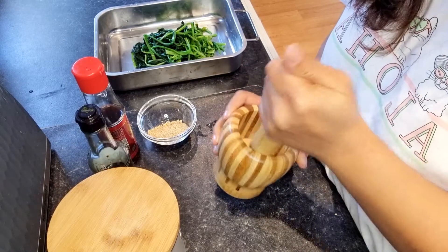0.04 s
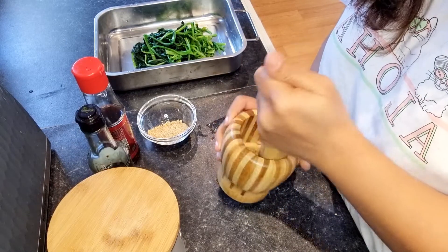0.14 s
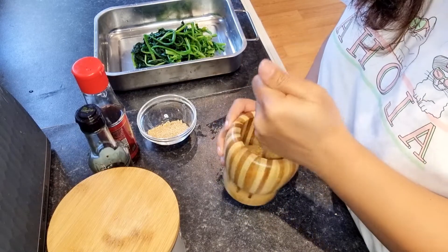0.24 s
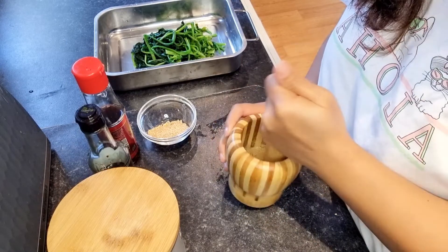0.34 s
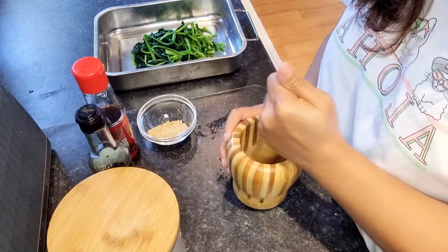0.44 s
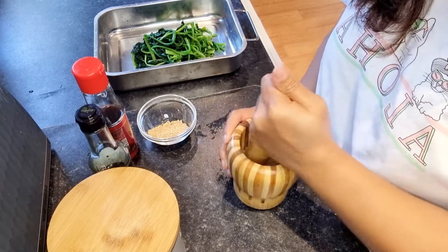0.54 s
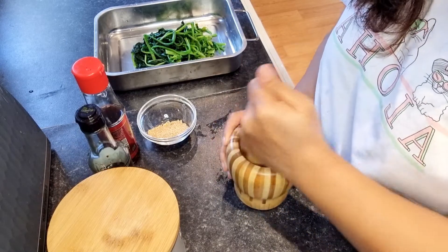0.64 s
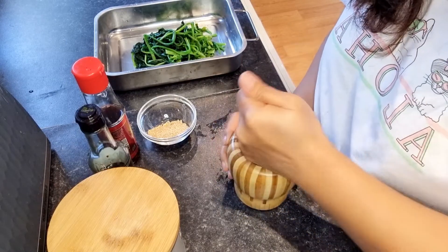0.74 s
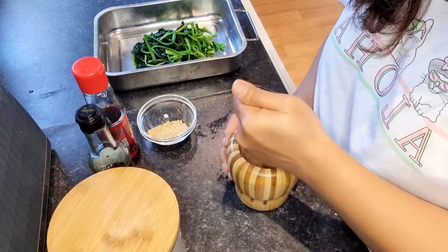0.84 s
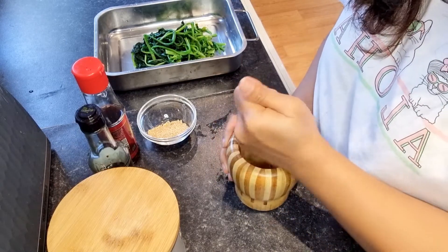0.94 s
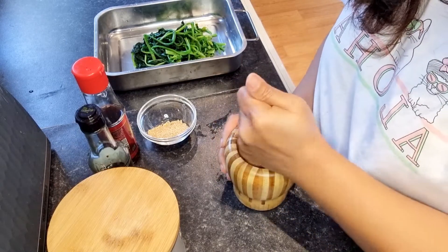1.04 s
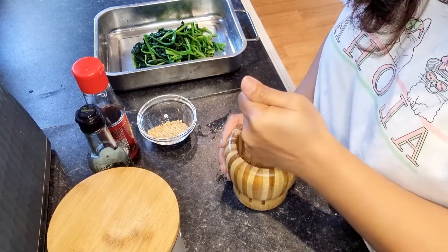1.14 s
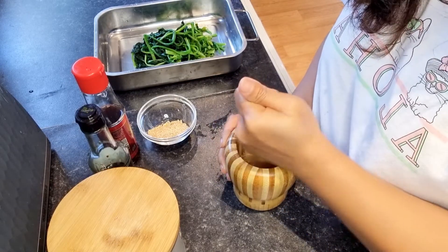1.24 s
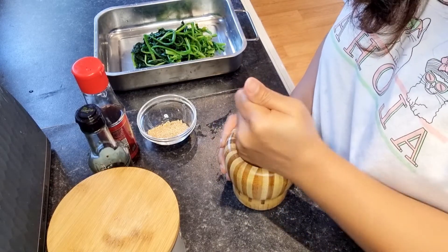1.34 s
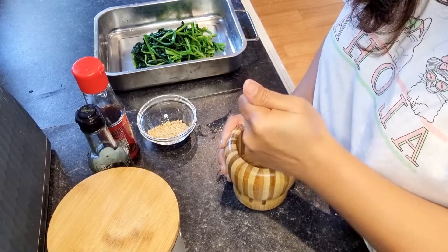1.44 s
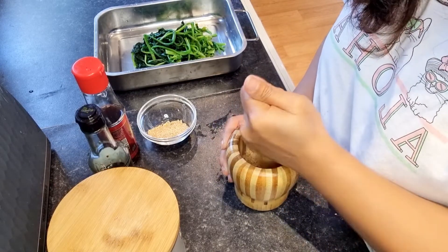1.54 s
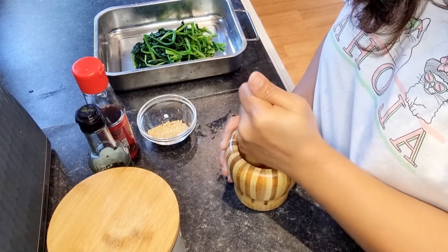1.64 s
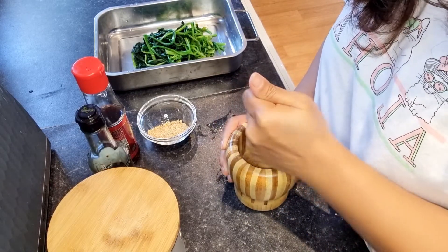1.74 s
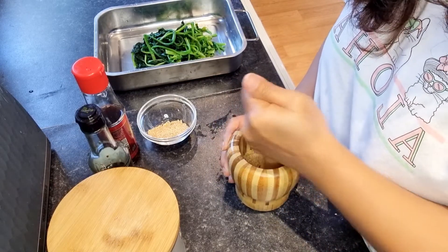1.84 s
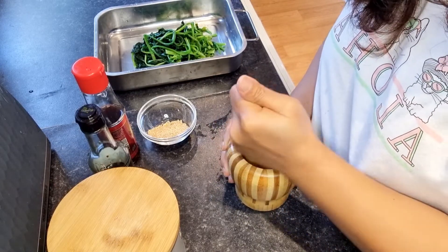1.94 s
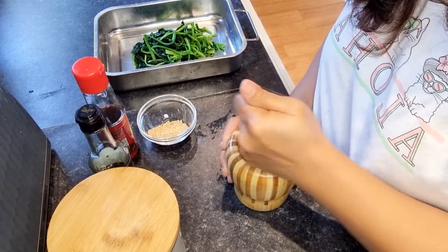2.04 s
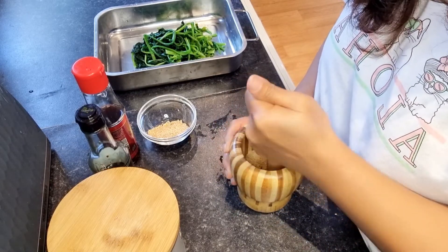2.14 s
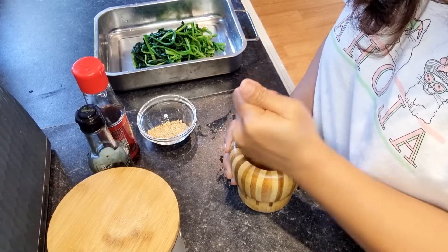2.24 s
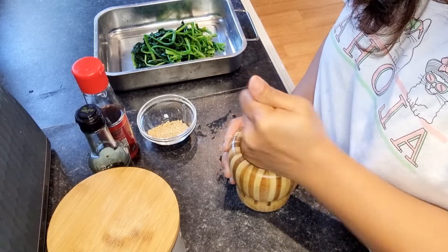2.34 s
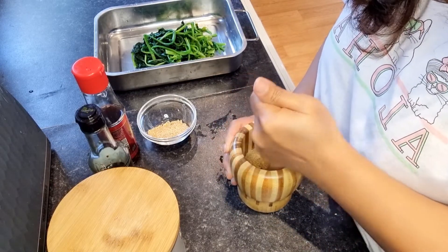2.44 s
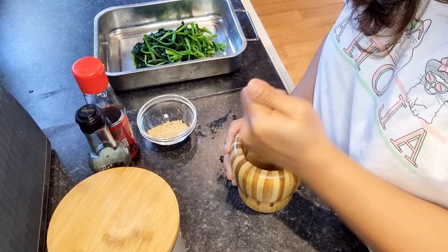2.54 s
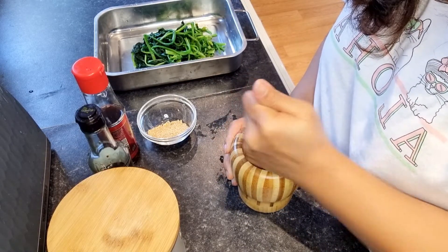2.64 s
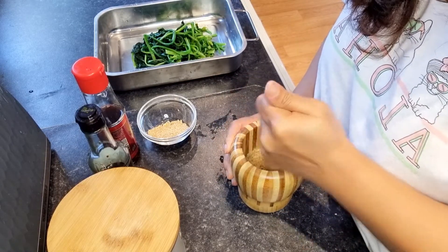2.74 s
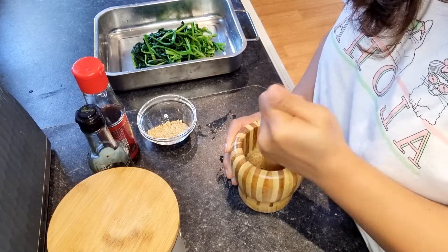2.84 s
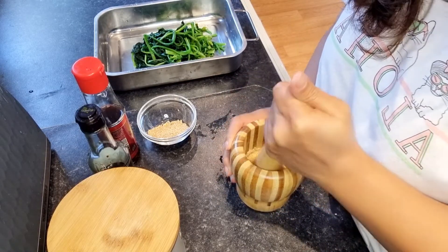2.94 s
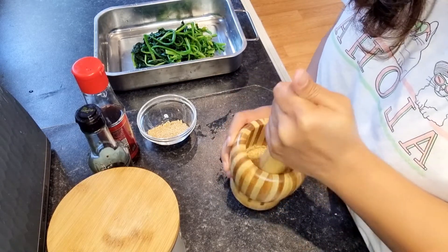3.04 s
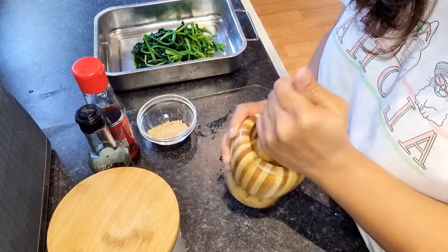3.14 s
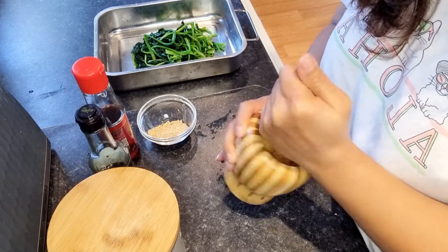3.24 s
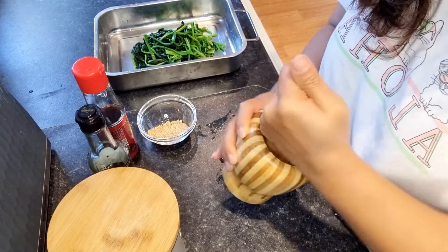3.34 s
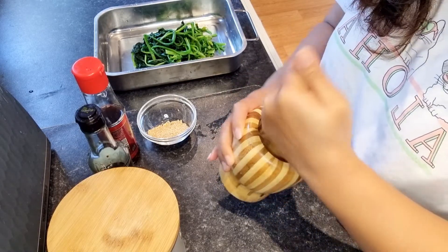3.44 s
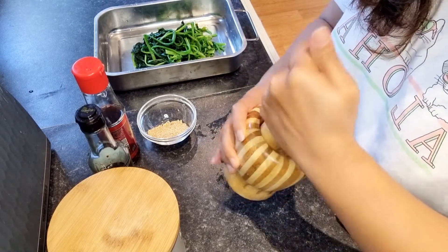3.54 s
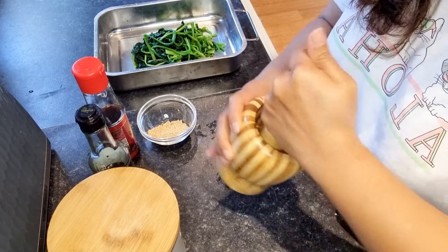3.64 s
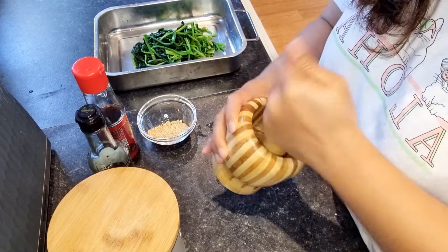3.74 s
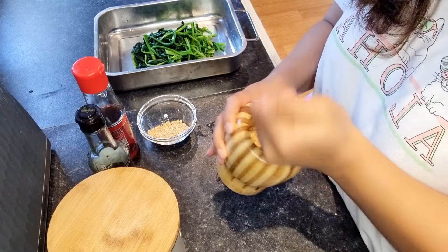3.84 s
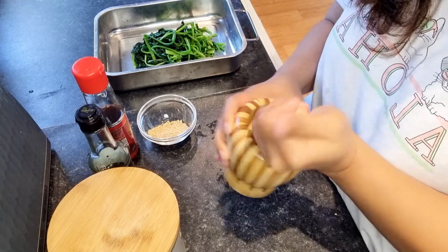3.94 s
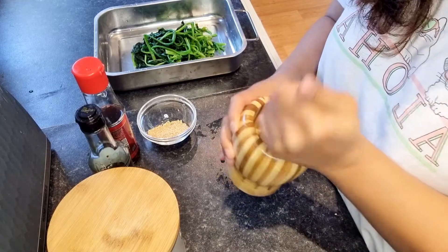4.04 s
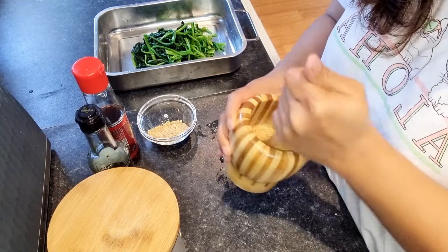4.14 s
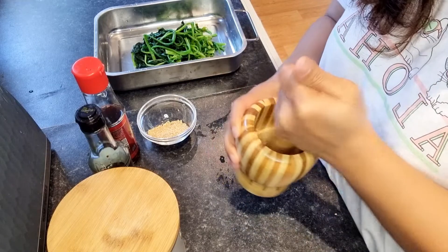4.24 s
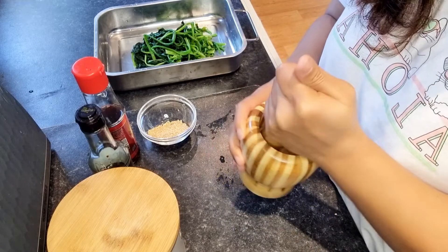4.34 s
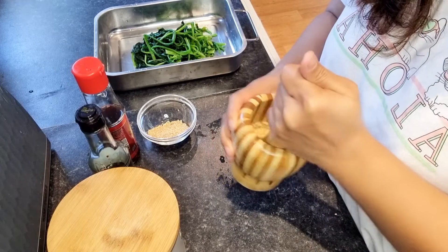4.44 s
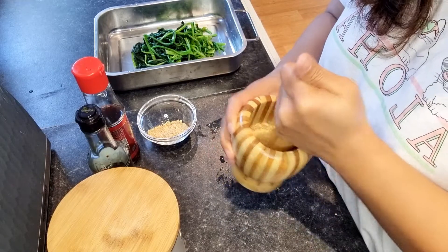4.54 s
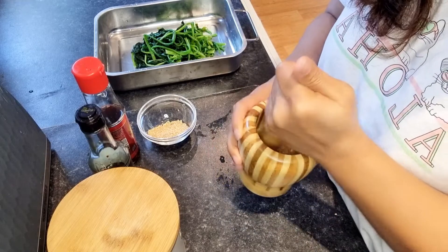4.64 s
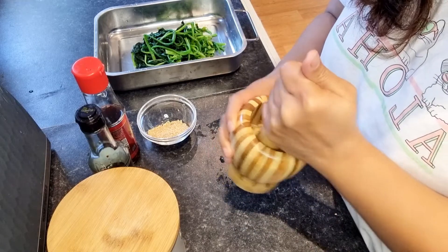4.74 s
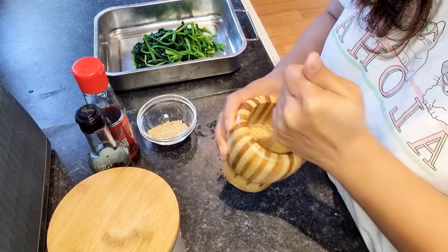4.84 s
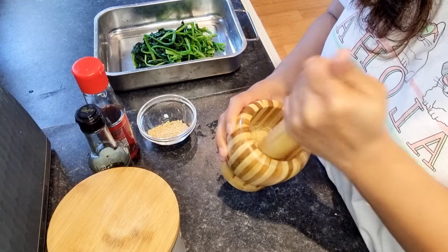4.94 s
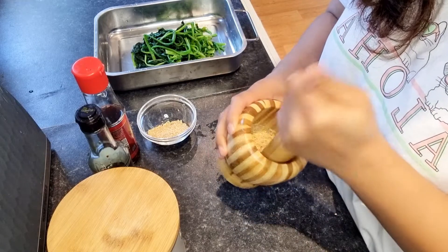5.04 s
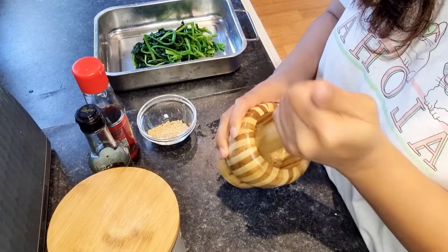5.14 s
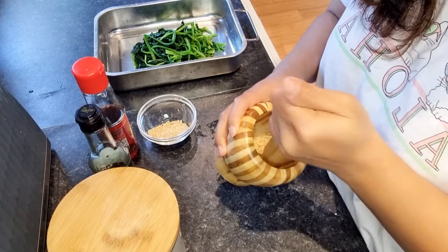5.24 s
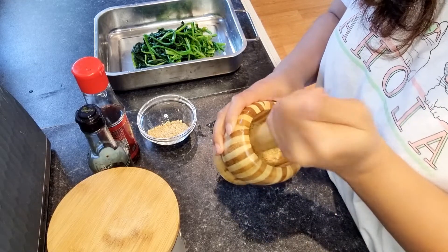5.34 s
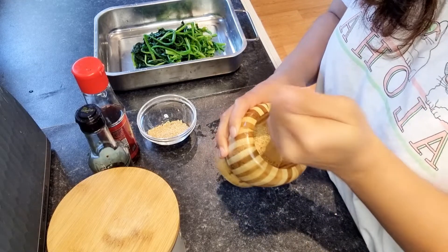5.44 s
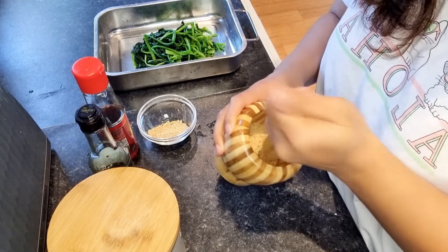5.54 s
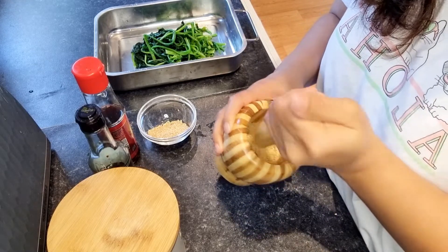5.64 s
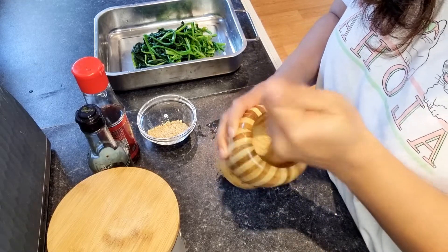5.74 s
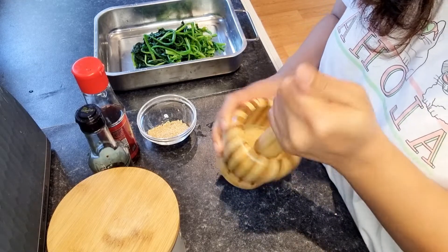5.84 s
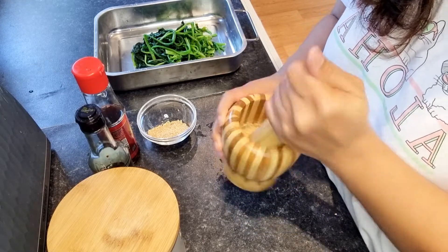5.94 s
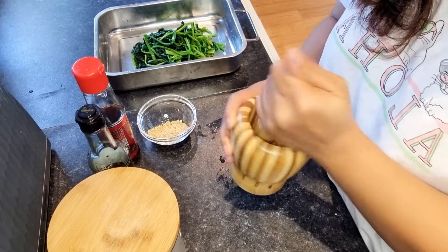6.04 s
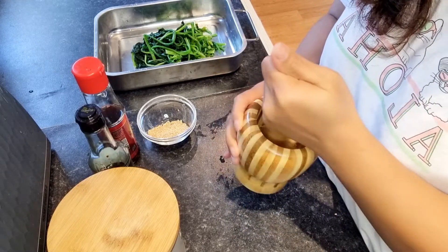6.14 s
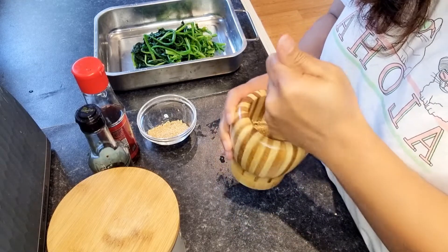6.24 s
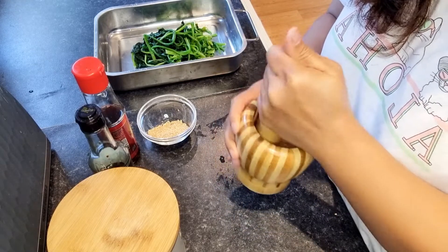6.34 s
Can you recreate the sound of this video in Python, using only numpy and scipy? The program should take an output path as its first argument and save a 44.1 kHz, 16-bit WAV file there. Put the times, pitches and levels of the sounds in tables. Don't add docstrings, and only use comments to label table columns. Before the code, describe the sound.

Seeds rustle faintly, then a heavy wooden thump on a stone counter starts steady grinding: dry hissing strokes, crisp seed cracks, muffled low bumps. Midway the pestle knocks the bowl wall, stirs more hollowly, and then raps the rim five times, loud and short, before a quick double tap and renewed grinding. Recorded within arm's length in stereo, with short kitchen reflections and faint low rumble.

```python
import sys
import numpy as np
from scipy import signal
from scipy.fft import rfft, irfft
from scipy.io import wavfile

SR = 44100
rng = np.random.default_rng(int(sys.argv[2]) if len(sys.argv) > 2 else 0)


def pcm_store(signal):
    levels = np.round(np.clip(np.atleast_2d(signal), -1, 1) * 32767)
    wavfile.write(sys.argv[1], SR, levels.astype(np.int16).T)


def convert_level_to_amplitude(level_db):
    exponent = np.asarray(level_db, float) / 20
    return 10 ** exponent


N = 281378

# (frequency [Hz], level [dB])
APPLIANCE_TONE = [(10104, -106)]
# (time [s], gain [dB], half-length [s])
RUMBLE_SWELLS = [
    (0.0, -6.5, 0.27),
    (4.2, 4.5, .15),
    (4.7, 1.5, 0.089),
    (5.84, 9, .08),
]
# (frequency [Hz], width [Hz], level [dB], t60 [s])
KITCHEN_BANDS = [(240, 320, -19.5, 0.38), (700, 460, -15.5, 0.18), (1210, 4700, -24.5, 0.44),
                 (2350, 3300, -10, 0.16), (3570, 2800, -16.5, 0.39), (4800, 2800, -8, 0.21),
                 (7200, 1500, -11.5, 0.2), (1956, 380, -25.5, 0.44)]
# (time [s], level [dB])
FOOT_LOAD = [(0, -73), (.34, -71), (.47, -40), (.58, -66), (.83, -54), (1.1, -44.5), (1.35, -46.5),
             (1.55, -55), (1.78, -47), (2.02, -54.5), (2.2, -51), (2.42, -52.5), (2.95, -52.5), (3.18, -70),
             (4.6, -71.5), (5.4, -68), (5.9, -62.5), (6.38, -71)]
# (frequency [Hz], width [Hz], level [dB])
COUNTER_MODES = [(225, 60, -3), (262, 50, -6), (303, 28, 0), (330, 32, 0)]
# (frequency [Hz], level [dB], t60 [s])
FOOT_MODES = [(109.7, 8.5, 0.051), (159, -9, 0.1), (186, -3.5, 0.1), (220, -3, 0.07), (299.4, -0.5, 0.096),
              (323, 2, 0.13), (473, -21, 0.22), (530, 9.5, 0.036), (579, 3, 0.034), (718, 16, 0.032),
              (775, 13.5, 0.042), (868, 11, 0.033), (950, 3, 0.04), (1155, -22, 0.017), (1211, -5.5, 0.059),
              (1270, 0, 0.02), (1500, -1.5, .012), (1570, 1, 0.03), (1850, 1, 0.034), (2050, 1, .03),
              (2300, -6.5, 0.006), (2690, 2, .018), (3000, -9.5, .012), (3400, -8, .015)]
# (time [s], knock peak [dB], boom peak [dB], click peak [dB], upper knock against knock [dB])
FOOT_THUDS = [(0.299, -51.5, -74.5, -56, 10.5), (0.361, -9.5, -5.5, -31.5, 2.5),
              (0.365, -13.5, -11, -54, -30), (0.374, -18.5, -41, -25.5, 2), (0.406, -34, -18, -41.5, 4),
              (0.657, -41.5, -32, -47, -8), (.667, -38, -38, -42.5, -3), (0.7, -45.5, -45, -51, -9),
              (0.869, -29, -30, -43, 14), (0.9, -61, -49, -47, 2), (1.084, -43, -47, -67, 2),
              (1.22, -43, -47, -70, -1), (1.244, -36.5, -46, -71, 1.5), (1.295, -45, -46, -70, 2),
              (1.328, -46, -50, -70, -1), (1.373, -42.5, -38, -72, 1), (1.386, -35.5, -31, -70, 4.5),
              (1.399, -31.5, -32, -56, 3.5), (1.412, -25.5, -23, -52, 7.5), (1.429, -25.5, -34, -74, -3),
              (1.448, -31.5, -28.5, -67, -1), (1.468, -40, -39, -70, -2), (1.487, -27.5, -28.5, -64, -4),
              (1.501, -35.5, -37, -70, -3), (1.748, -46, -43, -66, -1), (2.165, -43.5, -50, -68, 1),
              (2.776, -22.5, -29, -47, -7), (2.794, -30, -22.5, -44, 0), (2.815, -25, -36, -46, 6.5),
              (2.999, -45, -30, -60.5, -5), (3.029, -49, -28, -63, -7), (3.058, -59, -45, -60, 7),
              (4.077, -50.5, -67.5, -43, 11)]
# (frequency [Hz], width [Hz], level [dB])
BOWL_MODES = [(3810, 330, 15), (4340, 1900, -7.5), (5240, 810, 5), (3650, 60, 10.5), (3960, 60, 8.5),
              (7050, 1400, 9), (7250, 39, -4)]
# (start [s], end [s], rustle [dB], crush against rustle [dB], hollow against rustle [dB])
SEED_STROKES = [(-.03, 0.02, -85, -9, 18), (0.119, 0.225, -67.5, -12.5, 7), (0.277, 0.31, -62, -15, 0.5),
                (0.414, .64, -65.5, -6.5, -1), (0.658, 0.68, -52.5, -15, -4.5),
                (0.71, 0.935, -60, -5.5, -27), (0.906, 1.164, -56.5, -1, -6.5),
                (1.178, 1.635, -58.5, -5, -14.5), (1.64, 1.866, -56.5, -2, -16.5),
                (1.86, 1.947, -56.5, 4.5, -8), (1.958, 2.057, -52, 4.5, -8.5), (2.099, 2.4, -57, 1, -9),
                (2.41, 2.81, -56, 2, -14), (3.101, 3.14, -54, -8, -3.5), (3.208, 3.415, -56, -1.5, -8),
                (3.642, 3.9, -56.5, -4.5, -5), (3.904, 4.021, -56, 5.5, -4.5),
                (4.04, 4.338, -57, -2.5, -10), (4.334, 4.819, -55, 0, -11.5), (5.954, 6.098, -55, -7.5, -7),
                (6.11, 6.255, -59, -2, -11), (6.295, 6.4, -53.5, -5.5, -7)]
# (start [s], end [s])
DEEP_STIRRING = [
    (3.12, 3.52),
    (3.83, 4.98),
    (6.08, 6.5),
]
# (time [s], peak [dB], top [dB], pitch [Hz], left minus right [dB])
SEED_CRACKS = [(0.636, -63, -73, 3500, -7), (0.6629, -43.5, -58, 3800, 9), (0.9307, -26, -67, 3440, 4.5),
               (1.069, -46.5, -60, 3710, 0), (1.1328, -43, -58, 5200, 0.0), (1.4665, -48, -69, 3800, -1),
               (1.4875, -44, -63, 3650, 0.0), (1.5269, -29, -45, 5450, 2), (1.6168, -48, -65, 5500, 8),
               (1.8644, -47, -53, 7020, 1.0), (1.8824, -35.5, -40, 7250, 7), (1.924, -47, -47, 7100, 14),
               (1.9626, -50, -43, 7950, 7), (1.9889, -35.5, -52, 7840, 3), (1.997, -46, -41, 7900, 6),
               (2.0082, -35, -46, 3770, 0), (2.039, -37, -36, 3580, 1.0), (2.3515, -48, -48.5, 3600, 4),
               (2.4175, -40, -40, 3800, 2), (2.4212, -45, -50, 3880, 3), (2.436, -36.5, -38, 7360, 5),
               (2.5314, -39, -52, 3630, 2), (2.585, -33.5, -33, 7160, 2), (2.6646, -52, -51.5, 3930, 0),
               (2.6964, -47, -47, 3940, 0), (2.7851, -39, -50, 3740, 5), (2.797, -42, -63, 3930, 6),
               (2.86, -51, -73, 3300, 4), (2.9, -55, -71, 3200, -2), (2.931, -58, -71, 3120, 5),
               (3.1148, -41.5, -58, 3130, 4), (3.1313, -39.5, -55, 4800, 7.5),
                      (3.2405, -47, -53, 3750, 0.5), (3.3094, -49, -64.5, 3750, -2),
                      (3.3488, -44.5, -56.5, 7820, 0), (3.6541, -31.5, -43.5, 3810, 1),
                      (3.7434, -45, -64, 3920, -2.5), (3.7703, -42.5, -67.5, 3900, 4),
                      (3.8202, -38.5, -54.5, 3800, 7), (3.8721, -40, -62, 4040, 1.5),
                      (3.9235, -25.5, -34.5, 7230, 4.5), (3.9439, -32, -34.5, 7400, 4.5),
                      (3.9724, -37.5, -54.5, 7260, 13), (4.0287, -38.5, -51.5, 3970, 6),
                      (4.0976, -38, -51, 3810, 5), (4.1589, -35, -56, 7510, -0.5),
                      (4.3425, -47, -62, 5720, 0), (4.3684, -49, -55, 3740, 4),
                      (4.4234, -41.5, -59, 8100, -1.5), (4.7087, -36.5, -44, 3700, 7),
                      (4.7745, -41.5, -57.5, 3940, 5), (5.986, -39, -58, 3750, 3),
                      (6.001, -38, -56, 3800, 4), (6.0204, -37, -43, 3850, 3)]
# (frequency [Hz], level [dB], t60 [s])
INNER_WALL_MODES = [(770, -10.5, 0.021), (907, -13, 0.074), (1150, -3, 0.02), (1300, 3.5, 0.041),
                    (1580, -13, 0.065), (1605, 6, 0.037), (1757, 0, 0.066), (1853, -8, 0.08),
                    (1950, -10.5, 0.15), (2900, -10, 0.027), (2970, 5, 0.013), (3200, 6, 0.013),
                    (3520, 2, 0.017), (4390, -2, 0.019)]
# (frequency [Hz], level [dB], t60 [s])
SEAT_MODES = [(617, -6.5, 0.014), (905, -2, 0.033), (1270, -4.5, 0.022), (1630, -4, 0.013),
              (1915, -2.5, 0.032), (2120, -6, 0.013), (2450, 5, .015), (3010, -6, .015), (3800, 4, 0.017),
              (5120, 2, 0.016), (7700, -10, .01)]
# (time [s], main ring [dB], low modes [dB], upper modes [dB], high modes [dB])
PESTLE_SETTLES = [
    (5.9562, -31.5, -27, -31, -34.5),
    (5.9925, -56, -33, -46, -51),
    (6.018, -49, -49, -49, -52),
]
# (frequency [Hz], level [dB], t60 [s])
LIP_MODES = [(830, 6, 0.0064), (1250, -6, 0.033), (1590, -5, 0.033), (1882, -9, 0.018), (2004, -13, 0.042),
             (2770, -3, 0.026), (3025, -6, 0.037), (4420, -5, 0.052), (4820, 5, 0.031), (5970, 8.5, 0.017),
             (7560, -10, 0.012)]
# (time [s], main ring [dB], low modes [dB], upper modes [dB], high modes [dB])
GLANCING_TAPS = [
    (5.8795, -23, -22, -29.5, -23),
    (5.8925, -25, -24, -30, -24.5),
]
# (frequency [Hz], level [dB], t60 [s])
FLANK_MODES = [(392, -16, 0.035), (568, -8, 0.073), (787, -7, 0.02), (840, -0.5, 0.032), (870, 0, 0.035),
               (1240, -1, 0.04), (1387, -15.5, 0.036), (1488, -0.5, 0.033), (1662, -4, .015),
               (1776, -5, 0.014), (1850, 0.5, 0.023), (1923, -0.5, 0.014), (2035, -4, 0.027),
               (2114, -12.5, 0.037), (2350, -7.5, 0.011), (2700, -5, 0.01377), (3000, 2, .016),
               (3298, -1, 0.015), (3750, 2.5, 0.0085), (4130, -9, 0.014), (4620, -9.5, 0.021),
               (5210, -4, 0.014), (6630, -9.5, 0.019), (8000, -12.5, 0.014)]
# (time [s], main ring [dB], low modes [dB], upper modes [dB], high modes [dB])
FLANK_RAPS = [
    (3.5642, -12, -23, -20.5, -17.5),
]
# (frequency [Hz], level [dB], t60 [s])
RIM_MODES = [(314.7, -22, 0.13), (550, -14.5, 0.077), (974, -9.5, 0.025), (914, -0.5, 0.093),
             (1094, 0, 0.048), (1309, -1.5, 0.044), (1500, -11, 0.01), (1580, 1.5, 0.037),
             (1566, -3, 0.083), (1817, -1.5, 0.014), (1872, 1, 0.028), (1922, -7.5, 0.04),
             (2044, -2.5, 0.018), (2230, -4, 0.018), (2360, -11.5, 0.023), (1995, -8, 0.031),
             (2528, 2.5, 0.015), (2550, -5.5, 0.025), (2752, 2.5, 0.02), (2872, -4, 0.027),
             (3147, -21.5, 0.017), (3575, -5.5, 0.0074), (3814, -6, .02), (4350, -3.5, 0.0089),
             (4600, -6, 0.012), (4750, -2.5, 0.013), (5320, -9, 0.015), (5990, -6.5, 0.011),
             (7330, -5.5, 0.0064), (7730, -5.5, 0.0044)]
# (time [s], main ring [dB], low modes [dB], upper modes [dB], high modes [dB])
RIM_RAPS = [
    (3.922, -51, -50, -66, -67.5),
    (5.0484, -14.5, -21, -15.5, -19.5),
    (5.2403, -6, -14.5, -8, -15),
    (5.4003, -8, -13, -12, -15),
    (5.5608, -6.5, -11.5, -9.5, -16.5),
    (5.7079, -8, -12, -8, -13),
]

PORT_LAG_S = 1.0e-4
TAPPING_S = (5.03, 6.0)
PLANTED_S = (.36, 2.95)
OPEN_S = (-.1, .25)
ROLLING_S = (1.0, 2.7)
BUMP_S = 2.9925


def unit(x):
    return x / np.sqrt(np.mean(x ** 2))


def band(x, lo_hz, hi_hz):
    return signal.sosfilt(signal.butter(3, [lo_hz, min(hi_hz, .45 * SR)], "bandpass", fs=SR, output="sos"), x)


def resonate(x, modes):
    return sum(convert_level_to_amplitude(db) * signal.lfilter(*signal.iirpeak(hz, hz / width, SR), x) for hz, width, db in modes)


def grains(rate, spread_db):
    ticks = (rng.random((2, N)) < rate / SR) * rng.standard_normal((2, N))
    return ticks * convert_level_to_amplitude(spread_db * np.minimum(rng.exponential(size=(2, N)), 3))


def flicker(rate, depth_db):
    knots = rng.standard_normal(int(N / SR * 60) + 2)
    place = np.arange(N) / SR * min(rate, 59)
    return convert_level_to_amplitude(depth_db * np.interp(place, np.arange(len(knots)), knots))


def during(span, edge_s):
    t = np.arange(N) / SR
    return np.clip(np.minimum(t - span[0], span[1] - t) / edge_s + .5, 0, 1)


def pan(db):
    return convert_level_to_amplitude([[db / 2], [-db / 2]])


def ports(x, pan_db=0.):
    n = x.shape[-1]
    delay = np.exp(-2j * np.pi * np.fft.rfftfreq(n, 1 / SR) * PORT_LAG_S)
    return np.array([x, irfft(rfft(x) * delay, n)]) * pan(pan_db)


def add(out, s, sound):
    i = int(s * SR)
    out[:, i:i + sound.shape[1]] += sound[:, :N - i]


def strike(modes, edges_hz, peaks_db, scatter_db, rise_s, longest_s, pan_db, turn, facing, slow=1):
    hz, db, t60 = np.transpose(modes)[:, :, None]
    strength, detune, start = rng.standard_normal((3, len(modes), 1))
    t = np.arange(int(.16 * SR)) / SR
    phase = 2 * np.pi * hz * (1 + 0.0051 * detune) * t + 0.69 * start
    apart = 2 * np.pi * hz * PORT_LAG_S + turn * np.minimum(hz / 900, 1) ** 2 * facing
    rise = (1 - np.exp(-t / (rise_s * np.clip(1600 / hz, 1, slow)))) ** 2
    decay = np.exp(-np.log(1000) * t / np.minimum(t60, longest_s))
    fade = convert_level_to_amplitude(db + scatter_db * strength) * rise * decay
    rings = fade * np.array([np.sin(phase + apart / 2), np.sin(phase - apart / 2)])
    register = np.searchsorted(edges_hz, hz[:, 0])
    parts = [rings[:, register == k].sum(axis=1) for k in range(len(peaks_db))]
    return sum(convert_level_to_amplitude(peak) * p / np.abs(p).max() for peak, p in zip(peaks_db, parts)) * pan(pan_db)


def whine():
    t = np.arange(N) / SR
    return sum(np.sqrt(2) * convert_level_to_amplitude(db) * np.sin(2 * np.pi * hz * t) for hz, db in APPLIANCE_TONE)


def house_rumble():
    t = np.arange(N) / SR
    gain = convert_level_to_amplitude(-55) * flicker(5.9, 1.7)
    for s, db, half_s in RUMBLE_SWELLS:
        gain = gain * convert_level_to_amplitude(db * np.exp(-((t - s) / half_s) ** 2))
    mid, side = band(rng.standard_normal((2, N)), 30, 79.5)
    return gain * unit(mid + 0.31 * side * np.array([[1], [-1]]))


def kitchen(dry):
    t, tail = np.arange(int(.5 * SR)) / SR, 0
    upper = band(dry[:1], 1250, 16000)
    blur = 1.2 * np.tanh(3 * unit(band(rng.standard_normal(N), 50, 320)))
    spread = dry[:1] + .65 * upper * (blur - 1)
    for hz, width, db, t60 in KITCHEN_BANDS:
        noise = resonate(rng.standard_normal((2, len(t))), [(hz, width, 0)])
        mid, side = resonate(noise, [(hz, 2 * width, 0)])
        pair = mid + min(hz / 1300, 1.1) * side * np.array([[1], [-1]])
        tail = tail + convert_level_to_amplitude(db) * unit(pair) * np.exp(-np.log(1000) * t / t60)
    tail = tail * np.clip(t / 0.0013, 0, 1) * convert_level_to_amplitude(-35.5)
    return signal.fftconvolve(spread, tail, axes=1)[:, :N]


def lead_in(hits):
    t = np.arange(700) / SR
    smear = rng.standard_normal((1, 700)) * np.exp(-t / 0.0041) * convert_level_to_amplitude(-31.0)
    return signal.fftconvolve(hits[:, ::-1], smear, axes=1)[:, :N][:, ::-1]


def rocking():
    load_db = np.interp(np.arange(N) / SR, *np.transpose(FOOT_LOAD))
    heavier_db = load_db + 67.5
    boom = convert_level_to_amplitude(load_db) * flicker(5.9, 0.7)
    body = convert_level_to_amplitude(-70 + 0.74 * heavier_db) * flicker(9.6, 2.8)
    knock = convert_level_to_amplitude(-74 + 0.3 * heavier_db) * flicker(11, 7.7)
    jolts = band(grains(600, 3.0), 75, 1500)
    modes = [(hz, 0.45 * np.log(1000) / np.pi / t60, db) for hz, db, t60 in FOOT_MODES]
    slab_ring = sum(flicker(12, 5.0) * resonate(jolts[1], [mode]) for mode in COUNTER_MODES)
    foot_ring = sum(flicker(16, 4.0) * resonate(jolts[0], [mode]) for mode in modes[7:17])
    foot = boom * unit(resonate(jolts[0], modes[:3]))
    foot = foot + body * unit(band(slab_ring, 230, 290))
    foot = foot + knock * unit(band(foot_ring, 440, 1600))
    return ports(foot)


def thuds():
    out, t = np.zeros((2, N)), np.arange(2500) / SR
    facing = rng.standard_normal((len(FOOT_MODES), 1))
    for s, knock_db, boom_db, click_db, upper_db in FOOT_THUDS:
        rise_s = .003 if ROLLING_S[0] < s < ROLLING_S[1] else .0009
        peaks_db = [boom_db, knock_db, knock_db + upper_db, click_db]
        blow = strike(FOOT_MODES, [400, 650, 1300], peaks_db, 1.5, rise_s, .12, -.4, 1.2, facing)
        scuff = band(rng.standard_normal((2, 2500)) * np.exp(-t / .012), 2200, 6000)
        blow[:, :2500] += convert_level_to_amplitude(click_db - 5.5) * scuff
        add(out, s + 0.00073, blow)
    return band(out, 75, 19000)


def strokes():
    t = np.arange(N) / SR
    rest_db = np.array([[-74], [-72.5], [-70], [-88]])
    power = np.zeros((4, N)) + convert_level_to_amplitude(rest_db) ** 2
    for start, end, db, crush_db, hollow_db in SEED_STROKES:
        attack = np.clip((t - start) / .035 + .5, 0, 1)
        release = np.exp(-np.maximum(t - end, 0) / 0.026)
        layers_db = db + np.array([[0], [crush_db], [hollow_db], [hollow_db - 6.5]])
        power += (attack * release * convert_level_to_amplitude(layers_db)) ** 2
    bowl, top, low, high = np.sqrt(power)
    return bowl, top, low, high * convert_level_to_amplitude(-27.5 * during(PLANTED_S, 0.11) + 11.5 * during(OPEN_S, 0.073))


def rubbing():
    bowl, top, low, high = strokes()
    seeds = unit(grains(1200, 4.2)) + 1.5 * rng.standard_normal((2, N))
    seeds[1] = 0.98 * seeds[1] + 0.066 * seeds[0]
    body = sum(flicker(28, 4.6) * resonate(seeds, [mode]) for mode in BOWL_MODES)
    body = band(body + convert_level_to_amplitude(-20) * seeds, 2500, 8800)
    note_hz = 1945 + (2400 - 1945) * sum(during(span, 0.06) for span in DEEP_STIRRING)
    note = np.sin(2 * np.pi * np.cumsum(note_hz) / SR)
    upper = unit(band(seeds, 8, 75)) * note + .08 * unit(band(seeds, 1100, 2800))
    lower = resonate(seeds, [(920, 120, 0), (560, 90, -3), (1800, 1400, -17)])
    hollow = low * flicker(25, 3.0) * unit(lower) + high * flicker(30, 3.5) * unit(upper)
    hollow[:, int(TAPPING_S[0] * SR):int(TAPPING_S[1] * SR)] = 0
    crush = unit(grains(900, 4.0)) + 1.6 * rng.standard_normal((2, N))
    air = band(np.diff(crush, 2, prepend=[[0, 0]] * 2), 8600, 19800)
    rustle = bowl * unit(body) + top * flicker(18, 2.2) * unit(air)
    return flicker(45, 1.8) * rustle + hollow


def cracks():
    out, t = np.zeros((2, N)), np.arange(1800) / SR
    shape = (1 - np.exp(-t / 0.0002)) * (np.exp(-t / 0.002) + 0.34 * np.exp(-t / 0.021))
    for s, db, top_db, hz, pan_db in SEED_CRACKS:
        burst = rng.standard_normal((2, 1800)) * shape
        burst[1] += 0.34 * burst[0]
        bowl = resonate(burst, [(hz, 0.06 * hz, 5.0)]) + 0.14 * resonate(burst, BOWL_MODES)
        bowl = bowl + 0.46 * band(burst, 3200, 15000)
        bowl = bowl / np.abs(bowl).max() + 0.34 * np.sin(2 * np.pi * hz * t) * np.exp(-t / 0.0042)
        crumbs = band(np.diff(burst, prepend=0), 9300, 19500)
        tick = convert_level_to_amplitude(db + 2.0) * bowl / np.abs(bowl).max()
        tick = tick + convert_level_to_amplitude(top_db + 12.0) * crumbs / np.abs(crumbs).max()
        add(out, s + 0.0001, tick * pan(pan_db))
    return out


def wall_bump():
    out, t = np.zeros((2, N)), np.arange(900) / SR
    scrape = band(rng.standard_normal((2, 900)) * np.exp(-t / 0.012), 3800, 7900)
    add(out, BUMP_S, convert_level_to_amplitude(-46.5) * scrape)
    facing = rng.standard_normal((len(INNER_WALL_MODES), 1))
    peaks_db = (-21.5, -17.5, -28.5)
    add(out, BUMP_S, strike(INNER_WALL_MODES, [1200, 2300], peaks_db, 0, 0.00079, 0.15, 0.37, 0.76, facing))
    return out


def raps():
    out, t = np.zeros((2, N)), np.arange(900) / SR
    chatter = (1 - np.exp(-t / 0.0022)) * np.exp(-t / 0.0051)
    # blows, modes, contact rise [s], how much slower the low modes rise, chatter [dB]
    spots = ((RIM_RAPS, RIM_MODES, .0006, 3.0, 1.5),
             (FLANK_RAPS, FLANK_MODES, .001, 1.2, -3.0),
             (GLANCING_TAPS, LIP_MODES, .0003, 1.5, -5.0),
             (PESTLE_SETTLES[:1], SEAT_MODES, .0004, 1.2, -3.0),
             (PESTLE_SETTLES[1:], SEAT_MODES, .002, 2.5, -6.0))
    for blows, modes, rise_s, slow, chatter_db in spots:
        facing = rng.standard_normal((len(modes), 1))
        for s, ring_db, low_db, upper_db, high_db in blows:
            peaks_db = np.array([low_db, ring_db, upper_db, high_db]) + 7.0
            pan_db = -3.5 * rng.uniform(-3.6, 1)
            blow = strike(modes, [1700, 2350, 3300], peaks_db, 1.5, rise_s, .08, pan_db, 1.1, facing, slow)
            splinters = band(rng.standard_normal(900) * chatter, 5200, 7900)
            blow[:, :900] += convert_level_to_amplitude(high_db + chatter_db) * ports(splinters, pan_db)
            contact = band(rng.standard_normal((2, 900)) * np.exp(-t / 0.0069), 700, 3200)
            blow[:, :900] += convert_level_to_amplitude(upper_db - 3.0) * contact
            add(out, s + 0.00065, blow)
    return out


def scene():
    blows = band(raps() + wall_bump(), 290, 19000) + thuds()
    hits = blows + cracks()
    room = kitchen(hits) + house_rumble() + whine()
    return hits + lead_in(blows) + room + rubbing() + rocking()


def band_limit(x):
    return signal.sosfilt(signal.butter(12, 16340, fs=SR, output="sos"), x)


def record(dry):
    heard = signal.sosfilt(signal.butter(2, 38, "highpass", fs=SR, output="sos"), dry)
    heard = signal.sosfilt(signal.ellip(8, .2, 50, 15750, fs=SR, output="sos"), heard)
    return band_limit(np.clip(heard, -1, 1))


dry = scene()
out = record(dry)
pcm_store(out)
```